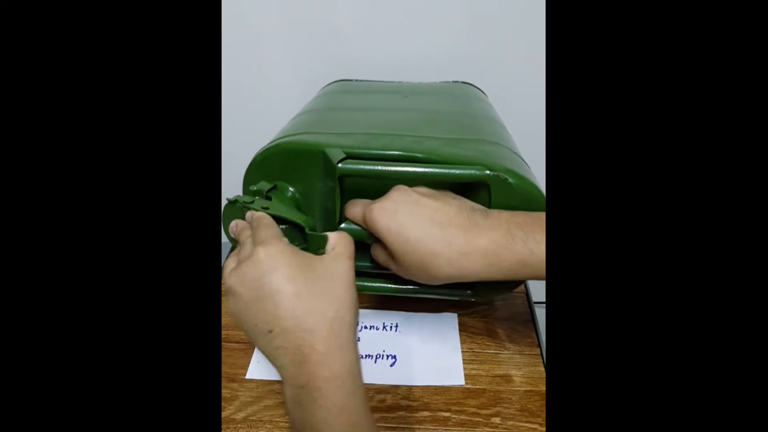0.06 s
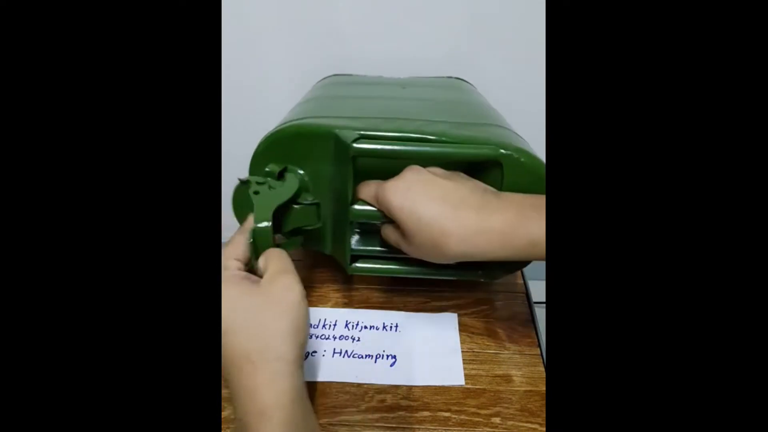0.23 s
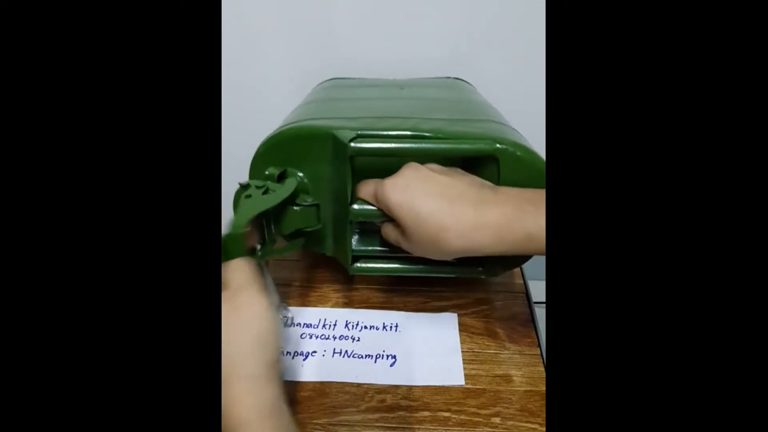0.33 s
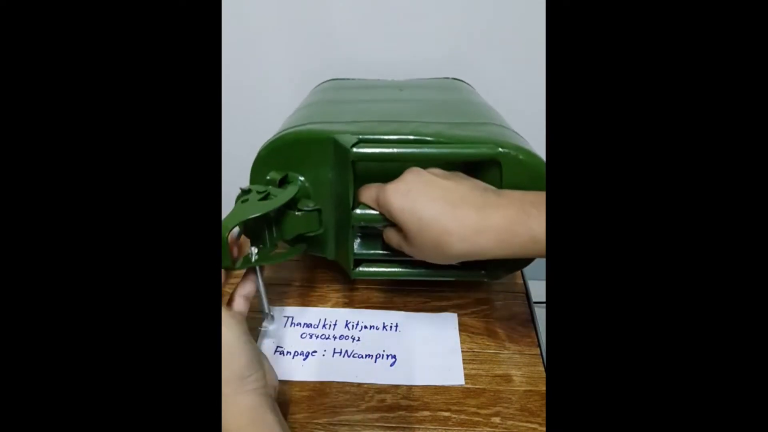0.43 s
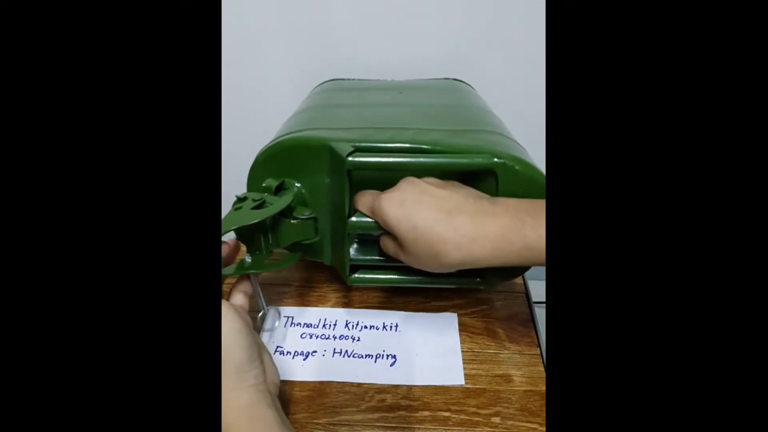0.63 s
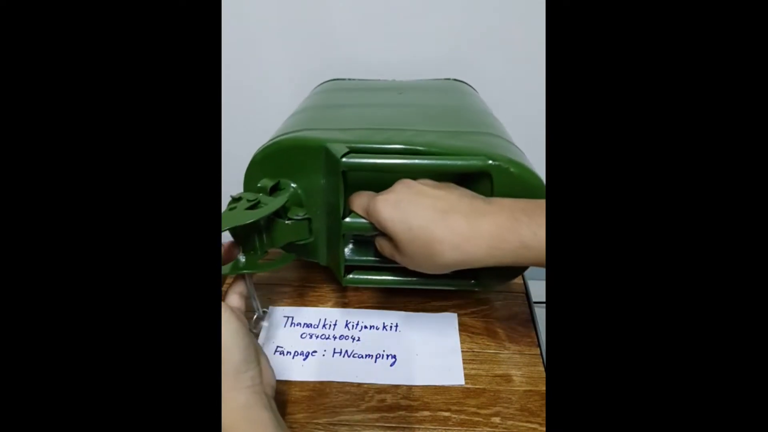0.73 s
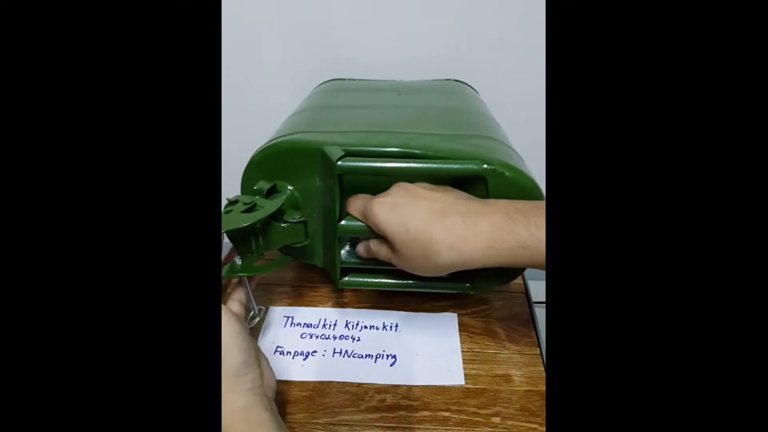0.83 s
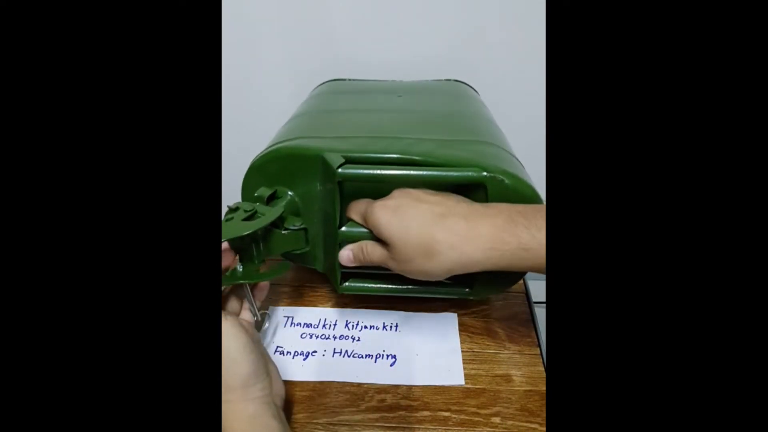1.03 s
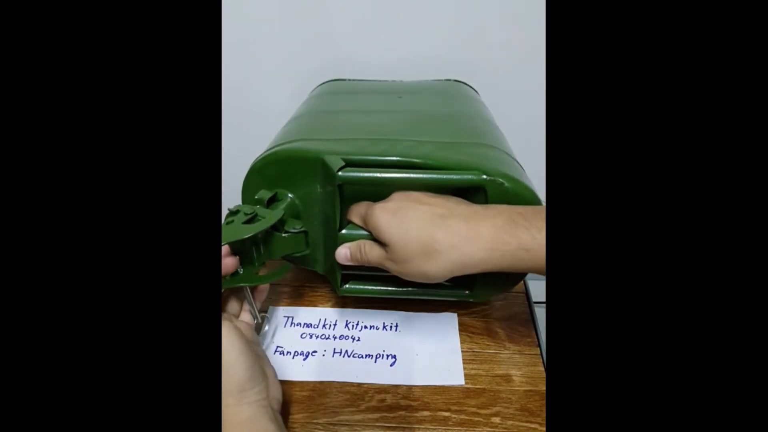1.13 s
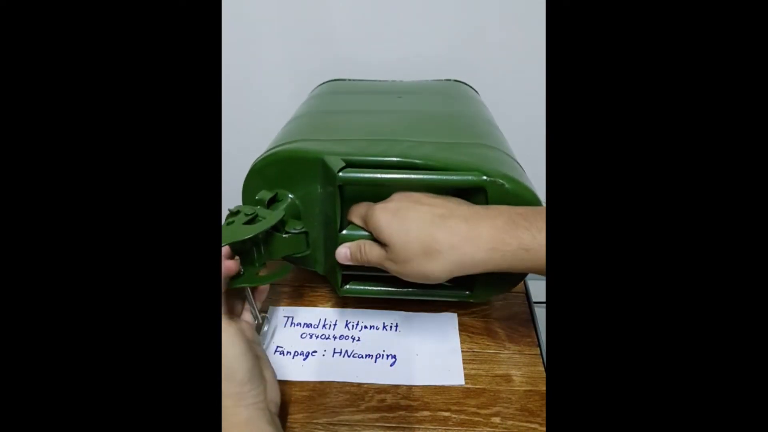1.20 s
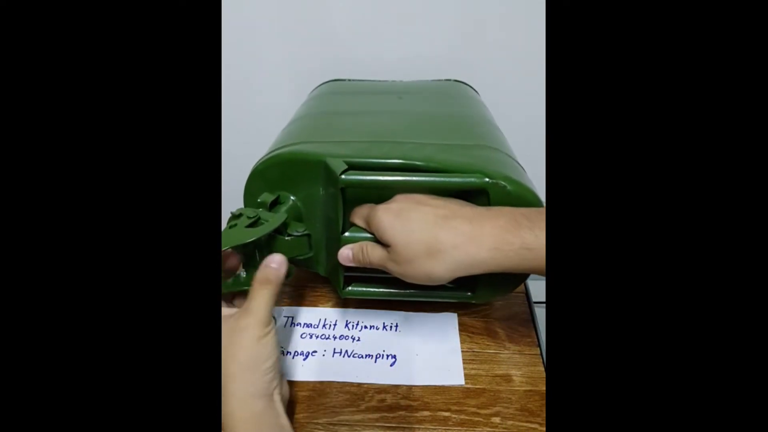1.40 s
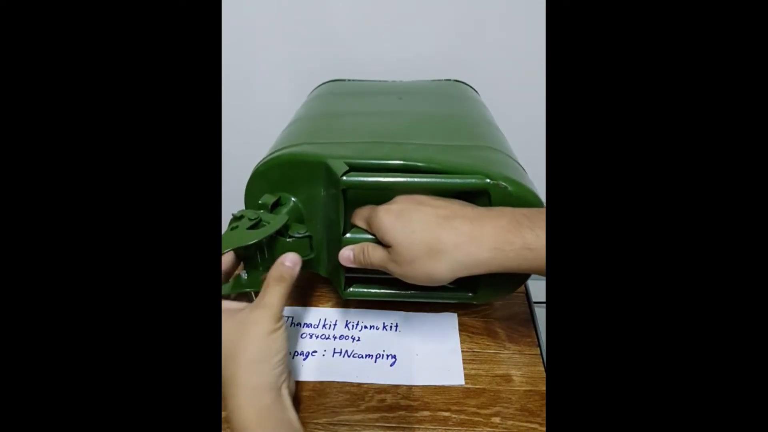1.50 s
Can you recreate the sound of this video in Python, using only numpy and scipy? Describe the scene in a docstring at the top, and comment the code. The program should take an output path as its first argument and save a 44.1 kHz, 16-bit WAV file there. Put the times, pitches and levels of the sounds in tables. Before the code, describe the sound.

A metal can's hinged cap snaps open with sharp clacks and a hollow ring.

```python
"""Opening a steel fuel can

An empty can stands on a wooden table in a small, hard room. Its catch slips off with a short rasp
and a snap, the hinged cap swings over and clacks against its stop, and the blows make the hollow
can ring. The loose latch ticks a few times over a quiet room hum."""
import sys
import numpy as np
from scipy import signal
from scipy.fft import rfft, irfft, next_fast_len
from scipy.io import wavfile

SR = 44100
rng = np.random.default_rng(int(sys.argv[2]) if len(sys.argv) > 2 else 0)


def materialize(psi):
    """Save the field psi as 16-bit PCM at rate SR to the path in sys.argv[1].

    A 1-D psi becomes a single channel; in a 2-D psi each row is a channel.
    """
    bounded = np.clip(np.atleast_2d(psi).T, -1, 1)
    quanta = np.round(bounded * 32767).astype(np.int16)
    wavfile.write(sys.argv[1], SR, quanta)


N = 68355

# Hits of the cap: t/s, thud/dB, thud f/Hz, thud t60/s (time to fade by 60 dB), crack/dB
CAP_HITS = [(0.241, -26, 1990, 0.036, -29), (0.2994, -7, 1000, 0.029, -23.5),
            (.3003, -11.5, 714, 0.043, -28), (.3020, -12.5, 405, 0.067, -33),
            (.3070, -12, 206, 0.11, -44.5), (.4020, -17.5, 649, .06, -29),
            (0.4064, -15.5, 300.5, 0.097, -34.5), (0.4684, -10, 937, 0.031, -19),
            (0.4729, -3, 413.6, 0.035, -28)]
# Tone of a crack: f/Hz, level/dB
CRACK_TONE = [(300, 6.5), (900, -3.5), (2000, 1.5), (3200, -15.5), (5000, -17), (8000, -36), (16000, -68)]
# Blows to the can: t/s, ring/dB, place (0 = catch, 1 = hinge stop), shell bass/dB, middle/dB, treble/dB
CAN_BLOWS = [(0.2411, -29.5, 0.61, -28, -25.5, -31), (.3000, -22.5, 0.36, -20, -27, -69),
             (.4030, -25, 0.67, -17.5, -40, -32.5), (0.4712, -23, 1, -28, -21, -28.5)]
# The can's own notes: f/Hz, level struck at the catch/dB, level struck at the hinge stop/dB, t60/s
CAN_NOTES = [(86, -9, -13, .55), (140, -11, -1, .5), (203, -3, -6, .3), (240, 1, -2, .6),
             (307, -5, -7, .35), (433, -6, -8, .32), (475, -20, -11, .6), (528, -11, -9, .52),
             (597, -12, -18, .5), (701, -3, -11, .55), (858, -11, -17, .45), (1041, -10, -9, .66),
             (1156, -11, -23, .42), (1197, -12, -19, .45), (1308, -17, -18, .65), (1475, -21, -10, .55),
             (1571, -17, -16, .35), (1610, -27, -17, .55), (1809, -22, -15, .54), (2145, -12, -27, .38),
             (2453, -15, -16, .48)]
# Dense ring of the steel shell: f/Hz, level/dB
SHELL_TONE = [(30, -46), (50, -10), (70, 14), (220, -1), (500, 8), (1100, 3), (1700, 0.5), (2400, -0.5),
              (3300, -7.5), (5800, -27.5), (8500, -35.5), (16000, -44)]
# How long that ring lasts: f/Hz, t60/s
SHELL_FADE = [(80, 0.2), (250, 0.92), (600, 0.53), (1200, 0.72), (2400, 0.49), (5000, 0.4), (14000, 0.59)]
# Loudness of the catch's rasp: t/s, level/dB
RASP_LEVELS = [(0.239, -30.5), (.255, -20.5), (.268, -32.5), (.280, -21.5), (0.302, -23.5), (0.323, -53)]
# Where the catch rings: f/Hz, width/Hz, level/dB
CATCH_NOTES = [(1191, 55, 3), (1603, 174, -6.5), (2082, 168, -2.5), (2477, 111, -5), (2760, 212, -10),
               (4300, 1380, -20), (6360, 1240, -22)]
# Ticks of the latch: t/s, level/dB, treble tilt/(dB per octave)
LATCH_TICKS = [(0.2558, -30, 1), (0.2771, -18, -5.5), (0.391, -49, 0), (0.421, -29.5, -8), (0.637, -46, -2),
               (0.723, -51, -9), (0.876, -52.5, -15), (1.0440, -55, -14), (1.1100, -47, -38),
               (1.13, -50, -19)]
# Tone of a tick: f/Hz, level/dB
TICK_TONE = [(150, -70), (900, -36), (2000, -11), (3500, -4.5), (4400, -5), (5400, 0), (6100, 2),
             (6700, -2), (7600, -5.5), (11000, -4), (16000, -8)]
# The latch's own notes: f/Hz, level/dB, t60/s
LATCH_NOTES = [(6080, -13, 0.052), (6560, -13.5, 0.033)]
# The lever's own notes: f/Hz, level/dB, t60/s
LEVER_NOTES = [(1205, 2.5, 0.019), (1385, 0.5, 0.03), (1860, -9, 0.029), (7860, -26, 0.059)]
# Background noise: f/Hz, level/dB
AIR_TONE = [(25, -42), (45, -4), (65, -5.5), (100, -9), (190, 2.5), (300, -7.5), (400, -10.5), (600, -6.5),
            (800, -13.5), (1200, -14), (1700, -21), (2500, -17.5), (3500, -32.5), (5700, -29), (8700, -40),
            (15800, -36)]
# Level of that noise, and the hum's notes: f/Hz, level/dB
AIR_DB, HUM = -50, [(98, -64.5), (304, -59)]
# How long the room echoes: f/Hz, t60/s
ROOM_FADE = [(100, 0.51), (1500, 0.5), (5000, 0.36), (14000, 0.27)]
# How alike left and right are: f/Hz, likeness (1 = the same)
LIKENESS = [(100, 0.8), (300, 0.91), (700, 0.36), (1200, 0), (2200, 0.21), (4000, 0), (12000, 0)]
# How much louder the left is: f/Hz, level/dB
LEFT_BOOST = [(60, -1.5), (150, 3), (500, 5), (1200, 2), (2300, 2.5), (5000, 1.5), (9000, 2.5),
              (15000, 1.5)]

BASS_HZ, MIDDLE_HZ, TREBLE_HZ = 286, 950, 2400
SLIPS_PER_S, RASP_FADE_DB_PER_S = 810, 470
LOW_CUT_HZ, TOP_HZ = 60.7, 16050


def cap():
    """Each hit of the cap is a short pitched thud with a crack on top."""
    thuds, cracks = np.zeros(N), np.zeros((2, N))
    for start, thud_db, hz, t60, crack_db in CAP_HITS:
        t = since(start)
        phase = 2 * np.pi * hz * t
        tone = np.sin(phase) + amp(-10) * np.sin(1.1 * phase)
        thuds += amp(thud_db) * decay(t, t60, attack=0.00069) * tone
        hiss = noise(lambda f: along(CRACK_TONE, f))
        cracks += amp(crack_db) * decay(t, t60=0.09, attack=0.00022) * hiss
    return room(thuds, echo_db=-14) + room(cracks, echo_db=-6)


def can():
    """Each blow rings the can's notes, mixed by where it lands, and shakes the whole shell."""
    rings = np.zeros((2, N))
    ends = [blow[0] for blow in CAN_BLOWS[1:]] + [N / SR]
    for (start, ring_db, place, bass_db, middle_db, treble_db), end in zip(CAN_BLOWS, ends):
        t = since(start)
        choke = amp(-60 * since(end) / 0.02)  # the next blow stops these notes
        for hz, catch_db, hinge_db, t60 in CAN_NOTES:
            scatter_db, phase, apart = rng.standard_normal(3)
            spread = apart * stereo_angle(hz) * np.array([[.5], [-.5]])
            db = ring_db + np.interp(place, [0, 1], [catch_db, hinge_db]) + scatter_db
            tone = np.sin(2 * np.pi * hz * t + .5 * phase + spread)
            rings += amp(db) * choke * decay(t, t60, attack=.005) * tone
        force = [(BASS_HZ, bass_db), (MIDDLE_HZ, middle_db), (TREBLE_HZ, treble_db)]
        shell = noise(lambda f: along(SHELL_TONE, f))
        struck = filtered(shell, lambda f: amp(along(force, f)))
        rings += fade_by_pitch(struck, SHELL_FADE, start)
    return rings


def catch():
    """The catch sticks and slips over its lip, and each tiny jerk makes it ring."""
    def steel(f):
        return sum((-1) ** k * amp(db) * 1j * f * width / (hz * hz - f * f + 1j * f * width)
                   for k, (hz, width, db) in enumerate(CATCH_NOTES))

    slips = (rng.random((2, N)) < SLIPS_PER_S / SR) * rng.uniform(0.19, 1, (2, N))
    times, levels = np.transpose(RASP_LEVELS)
    slide_db = np.interp(since(0), times, levels, left=-np.inf)
    slide_db -= RASP_FADE_DB_PER_S * since(times[-1])
    return room(amp(slide_db) * unit(filtered(slips, steel)), echo_db=-2.5)


def latch():
    """Steel ticks on steel with a scratch and a short ping, and the lever gives one light tap."""
    def ring(notes, t):
        return sum(amp(db) * decay(t, t60, attack=0.0009) * np.sin(2 * np.pi * hz * t)
                   for hz, db, t60 in notes)

    ticks = np.zeros((2, N))
    for start, db, tilt in LATCH_TICKS:
        t = since(start)
        hiss = noise(lambda f: along(TICK_TONE, f) + tilt * np.log2(1 + f / 1000))
        scratch = decay(t, t60=0.031, attack=0.0018) * hiss
        ticks += amp(db) * (scratch + ring(LATCH_NOTES, t))
    tap = amp(-33.5) * ring(LEVER_NOTES, since(1.1008))
    return room(ticks, echo_db=-4.5) + room(tap, echo_db=-11)


def room_hum():
    """Soft, steady noise with two wavering low notes."""
    hum = np.zeros(N)
    for hz, db in HUM:
        drift = np.cumsum(rng.standard_normal(N)) * 0.0219
        hum += amp(db) * np.sqrt(2) * np.sin(2 * np.pi * hz * since(0) + drift)
    return amp(AIR_DB) * noise(lambda f: along(AIR_TONE, f)) + hum


def room(x, echo_db):
    """A sound plus its echo from the hard walls."""
    tail = fade_by_pitch(noise(np.zeros_like), ROOM_FADE, start=0.0039)
    tail /= np.linalg.norm(tail[0])
    return x + amp(echo_db) * signal.fftconvolve(np.atleast_2d(x), tail, axes=1)[:, :N]


def amp(db):
    """Turn decibels into a volume factor."""
    return 10 ** (np.asarray(db) / 20)


def unit(x):
    """Scale to an average power of 1."""
    return x / np.sqrt(np.mean(x ** 2) + 1e-20)


def along(table, hz):
    """Read between the rows of an (f/Hz, value) table, on a pitch scale."""
    freqs, values = np.transpose(table)
    return np.interp(np.log(hz + 1), np.log(freqs + 1), values)


def since(start):
    """Seconds since the start, zero before it."""
    return np.maximum(np.arange(N) / SR - start, 0)


def decay(t, t60, attack):
    """A quick rise, then a fade; all times in seconds."""
    return np.exp(-np.log(1000) * t / t60) * (1 - np.exp(-t / attack))


def filtered(x, gain):
    """Turn each frequency f up or down by gain(f)."""
    size = next_fast_len(N + SR // 2)
    return irfft(rfft(x, size) * gain(np.fft.rfftfreq(size, 1 / SR)), size)[..., :N]


def stereo_angle(hz):
    """How far left and right differ: 0 when they are the same."""
    return np.arccos(np.clip(along(LIKENESS, hz), -1, 1)) / 2


def noise(level_db):
    """Stereo noise shaped by level_db(f), nearly the same on both sides in the bass."""
    def gain(f):
        angle = stereo_angle(f)
        return amp(level_db(f)) * [np.cos(angle), np.sin(angle)]

    mid, side = filtered(rng.standard_normal((2, N)), gain)
    return unit(np.array([mid + side, mid - side]))


def fade_by_pitch(x, fade_table, start):
    """Bring a sound in at the start, then let each frequency fade at its own speed."""
    hz, t, bands = signal.stft(x, SR, nperseg=512)
    fade = amp(-60 * np.maximum(t - start, 0) / along(fade_table, hz)[:, None])
    rise = 1 - np.exp(-since(start) / 0.003)
    return rise * signal.istft(bands * fade, SR)[1][:, :N]


def scene():
    """Add all the sounds and place them a little to the left."""
    mix = cap() + can() + catch() + latch() + room_hum()
    return filtered(mix, lambda f: amp(along(LEFT_BOOST, f) * np.array([[.5], [-.5]])))


def record(dry):
    """Cut away the deepest bass and the highest treble."""
    low_cut = signal.butter(5, LOW_CUT_HZ, 'highpass', fs=SR, output='sos')
    return filtered(signal.sosfilt(low_cut, dry), lambda f: f < TOP_HZ)


dry = scene()
out = record(dry)
materialize(out)
```